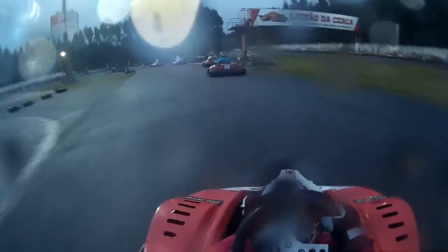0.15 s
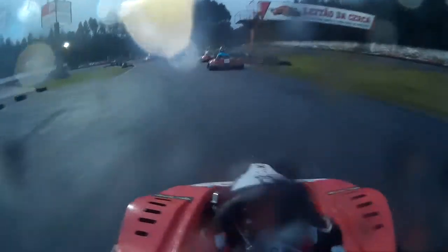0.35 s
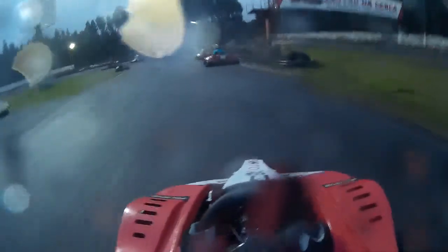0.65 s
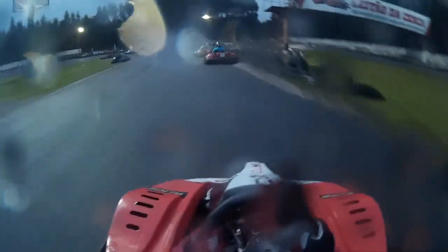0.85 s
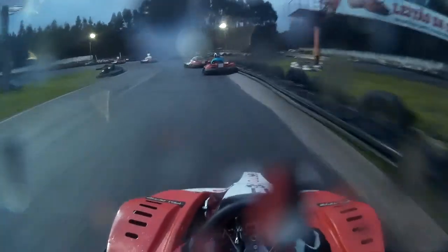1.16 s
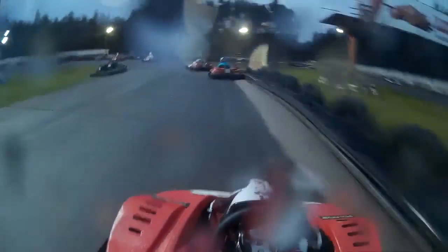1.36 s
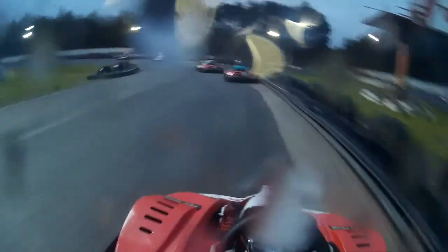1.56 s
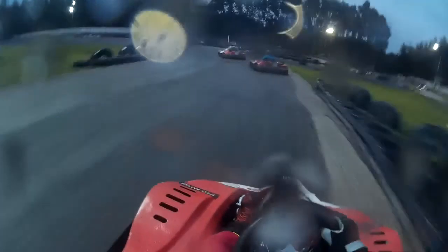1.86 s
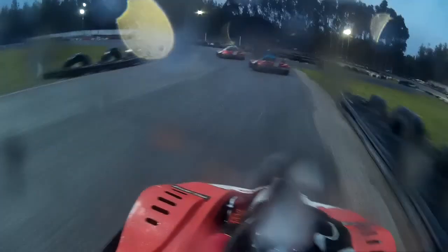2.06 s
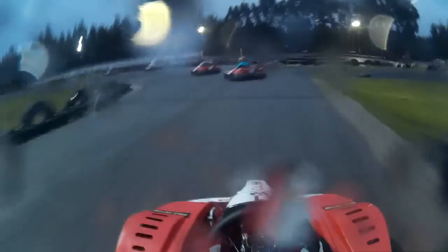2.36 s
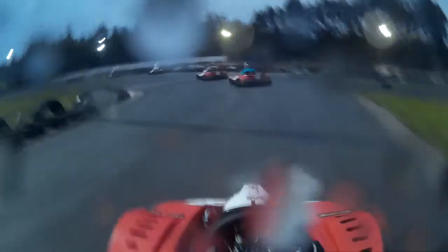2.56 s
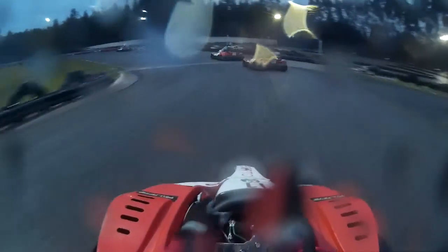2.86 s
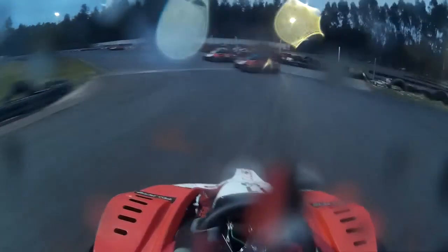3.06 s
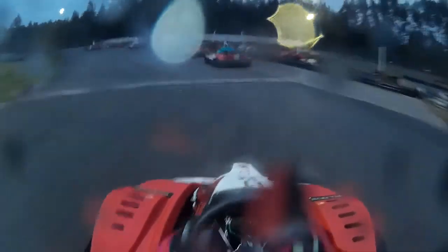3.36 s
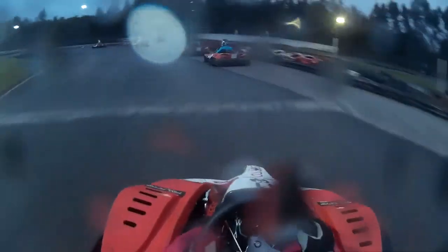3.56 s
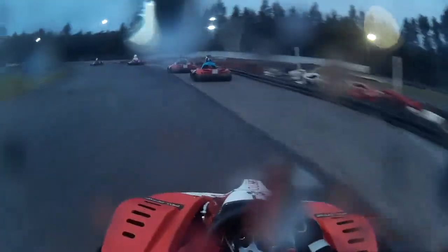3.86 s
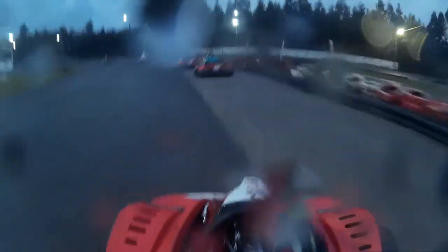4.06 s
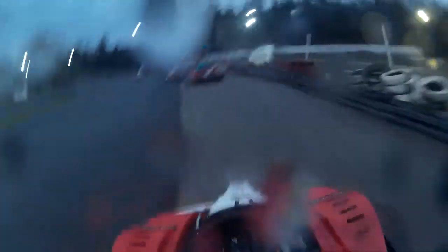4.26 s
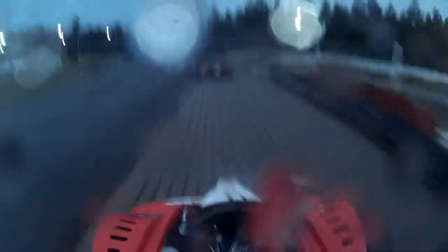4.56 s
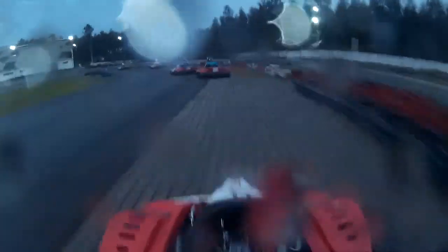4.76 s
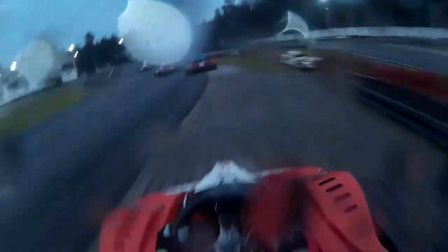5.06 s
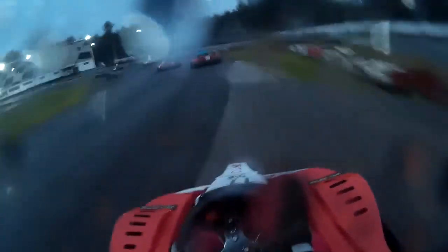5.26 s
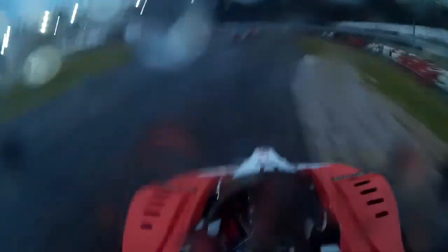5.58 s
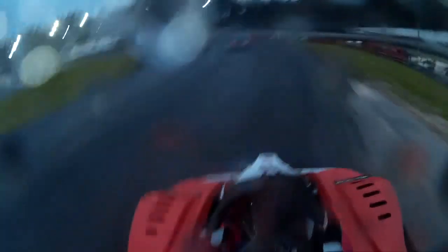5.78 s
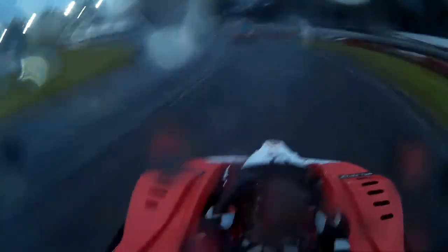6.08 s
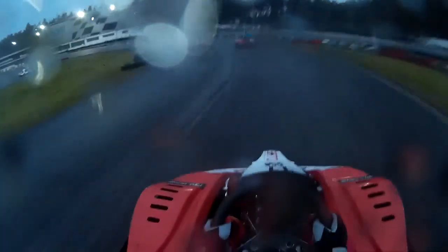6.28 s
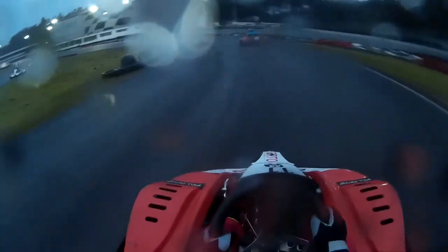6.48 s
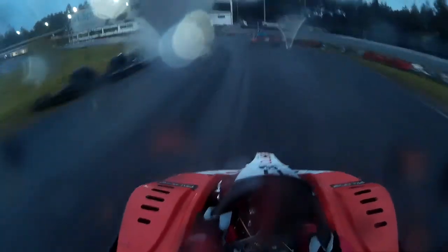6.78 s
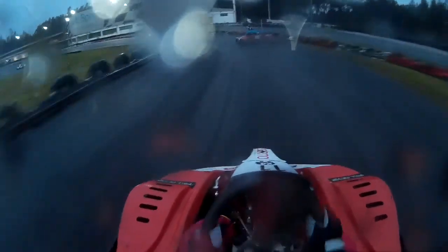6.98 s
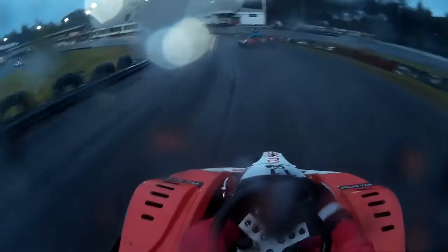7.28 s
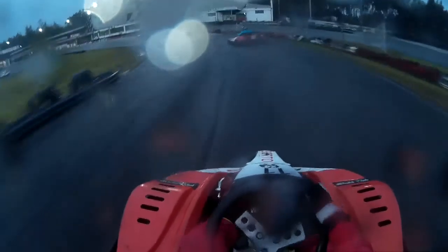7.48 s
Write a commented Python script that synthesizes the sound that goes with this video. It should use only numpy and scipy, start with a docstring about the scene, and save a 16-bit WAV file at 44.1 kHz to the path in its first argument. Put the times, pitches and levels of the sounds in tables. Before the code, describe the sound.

A single-cylinder kart engine is heard close up from on board, with a boxy, enclosed tone. It starts on the throttle with a rapid, rasping putter, lifts at about 0.4 seconds, blips near 0.7, then coasts more softly from 0.9 to 2. It barks again until 2.8 and falls to its lowest pitch around 3.5. After a few quick stabs it pulls steadily from about 3.9 seconds, wavering, then climbing to its highest pitch at 6.7. The throttle shuts, the pitch sags, and the engine picks up again at 7.4. Throughout, the chain rattles, whining thinly under load, over low tyre rumble and swells of frame vibration. Dull bumps come near 1.7, 2.4, 4.4 and between 5.5 and 5.9 seconds. A kart ahead adds fainter runs of sharp exhaust crackle, mostly from 3 to 5.5 seconds and again around 7.

```python
"""The exhaust of a four-stroke, single-cylinder kart, heard on board through a closed camera housing.
On the throttle each firing excites the pipe's modes (a thump) and releases a turbulent jet (a bark).
The piston shakes the frame, the chain whines under tension and bumps thud in the chassis.
Off the throttle, chain and tyres rattle on and the sharper exhaust of a kart ahead is unmasked."""
import sys
import numpy as np
from scipy import signal
from scipy.fft import rfft, irfft
from scipy.io import wavfile

SR = 44100
rng = np.random.default_rng(int(sys.argv[2]) if len(sys.argv) > 2 else 0)


def file_out(sig):
    """Save sig as 16-bit WAV at sys.argv[1]."""
    # one column per channel
    cols = np.atleast_2d(sig).T
    # limit, then scale
    lim = np.clip(cols, -1, 1)
    pcm = np.round(lim * 32767).astype(np.int16)
    wavfile.write(sys.argv[1], SR, pcm)


N = 336483
TIME = np.arange(N) / SR
CRUISE_HZ = 27  # firing rate at cruising speed; excess_hz is the rate above it


def gain_of(db):
    """Amplitude ratio of a level in decibels."""
    return 10 ** (np.asarray(db) / 20)


def unit_rms(x):
    """Normalisation to rms 1."""
    return x / np.sqrt(np.mean(x ** 2) + 1e-20)


def wander(cutoff_hz):
    """Random fluctuation: low-passed noise of rms 1."""
    f = np.fft.rfftfreq(N, 1 / SR)
    return unit_rms(irfft(rfft(rng.standard_normal(N)) / (1 + (f / cutoff_hz) ** 4), N))


def add(mix, start, sound):
    """Superposition of a sound on the mix, in place."""
    part = mix[round(start * SR):][:len(sound)]
    part += sound[:len(part)]


def pulse_train(times, sizes, shape):
    """Convolution with impulses puts a scaled copy of the shape at each time."""
    impulses = np.zeros(N)
    impulses[np.clip(np.round(times * SR).astype(int), 0, N - 1)] = sizes
    return signal.oaconvolve(impulses, shape)[:N]


def puff(rise_s, decay_s, tail, tail_s):
    """Envelope of a gush of gas: a rise, then exponential decay with a weak, slower tail."""
    t = TIME[:SR // 10]
    shape = (1 - np.exp(-(t / rise_s) ** 2)) * (np.exp(-t / decay_s) + tail * np.exp(-t / tail_s))
    return shape / shape.max()


def microphone_hiss(level_db=-72):
    """Self-noise of the microphone: steady and white."""
    return gain_of(level_db) * rng.standard_normal(N)


# Resonances of the housing: f/Hz, bandwidth/Hz, boost/dB
HOUSING_MODES = [(732, 35, 6), (1351.5, 61, 7), (2878, 72, 7), (3103, 174, 6.5), (4029, 290, 12.5),
                 (5560, 250, 5), (7790, 830, 7), (10860, 950, 3.5)]
def through_housing(x, spectrum):
    """A minimum-phase filter of unit power gain imposes a source spectrum and the housing's resonances."""
    f = np.fft.rfftfreq(8192, 1 / SR)
    knots_hz, knots_db = np.transpose(spectrum)
    db = np.interp(np.log(f + 1), np.log(knots_hz), knots_db)
    db += sum(boost / (1 + (2 * (f - hz) / width) ** 2) for hz, width, boost in HOUSING_MODES)
    log_gain = np.log(gain_of(np.r_[db, db[-2:0:-1]]))
    response = np.exp(np.conj(signal.hilbert(log_gain)))
    ring = np.fft.ifft(response).real[:len(f)]
    return signal.oaconvolve(x, ring / np.linalg.norm(ring))[:N]


# Spectrum of the tyres' rumble: f/Hz, relative level/dB
TYRE_SPECTRUM = [(22, -26), (38, -14), (58, 0), (95, -8), (170, -13), (260, -12), (350, -15), (600, -19),
                 (1500, -45), (4000, -80)]
def tyre_roll(level_db=-42, lumpy_db=1):
    """Structure-borne noise: tyres on asphalt rumble through the frame, whatever the throttle does."""
    level = gain_of(level_db + lumpy_db * wander(2.9))
    return through_housing(level * rng.standard_normal(N), TYRE_SPECTRUM)


# Bumps in the track: t/s, level/dB, Gaussian width/s, upper cutoff f/Hz
TRACK_BUMPS = [(1.71, -34, .025, 85), (2.44, -36, .02, 85), (4.3, -36, .03, 600), (4.51, -32, .03, 90),
               (5.5, -33, .018, 260), (5.85, -36, .02, 120), (5.92, -33, .02, 300)]
def chassis_thuds():
    """Impact excitation: each bump draws a burst of low noise from the unsprung chassis."""
    out = np.zeros(N)
    for at, db, width, top_hz in TRACK_BUMPS:
        band = signal.butter(2, [45, top_hz], "band", fs=SR, output="sos")
        rumble = unit_rms(signal.sosfilt(band, rng.standard_normal(N)))
        out += gain_of(db) * rumble * np.exp(-.5 * ((TIME - at) / width) ** 2)
    return out


# Throttle bursts of the kart ahead: start t/s, duration/s, firing rate f/Hz, relative level/dB
AHEAD_BURSTS = [(1.148, 0.22, 24.8, -46), (1.744, 0.11, 24.6, -38), (3.074, .26, 25.2, -41.5),
                (3.351, 0.38, 26.9, -35), (4.053, 1.4, 28.5, -37.5), (7.027, 0.35, 30.3, -38.5)]
# Spectrum of its cracks: f/Hz, relative level/dB
CRACK_SPECTRUM = [(300, -28), (830, -10), (1060, 23.5), (1250, 24), (2000, -16.5), (3000, 1.5), (4000, -10),
                  (5600, -10), (6600, -25), (7800, -16.5), (11000, -29.5), (15000, -42)]
def kart_ahead(boost_db=7.0):
    """Pulsed jet noise: runs of bright cracks from an exhaust that points back at the listener."""
    gush = np.zeros(N)
    crack = puff(rise_s=.00092, decay_s=.013, tail=.08, tail_s=.023)
    for start, length, rate, db in AHEAD_BURSTS:
        firings = start + np.arange(0, length, 1 / rate)
        sizes = gain_of(db + boost_db + rng.standard_normal(len(firings)))
        gush += pulse_train(firings, sizes, crack)
    return through_housing(gush * rng.standard_normal(N), CRACK_SPECTRUM)


def chain_tension(opening, lag_s=.023):
    """First-order lag: the chain takes up the pull a little after the throttle."""
    pole = np.exp(-1 / (lag_s * SR))
    return 1 - signal.lfilter([1 - pole], [1, -pole], 1 - opening)


def chain_whine(cycles, firing_hz, tension, teeth_per_cycle=28, guard_hz=736, guard_width_hz=83):
    """Forced resonance: the sprocket's meshing tone swells and wavers near the chain guard's note."""
    resonance = 1 / (1 + (2 * (teeth_per_cycle * firing_hz - guard_hz) / guard_width_hz) ** 2)
    level = gain_of(-42.5 + 7.6 * resonance) * np.sqrt(np.maximum(tension, 0))
    level *= 1 + .3 * wander(14)
    phase_jitter = (.25 + 1.5 * resonance) * wander(9)
    return level * np.sin(2 * np.pi * teeth_per_cycle * cycles + phase_jitter)


# Spectrum of chain and valve gear: f/Hz, relative level/dB
GEAR_SPECTRUM = [(350, -27), (550, -3), (850, -2.5), (1020, 0.5), (1200, 5.5), (1900, 0), (2600, -15.5),
                 (3500, -28), (5000, -31.5), (8000, -41.5), (12000, -45.5), (15500, -53)]
def gear_rattle(cycles, tension, excess_hz, slack_db=4.5, db_per_hz=.31, flutter_db=1.5):
    """Amplitude-modulated noise: chain and valves grow with load and speed and throb at each crank turn."""
    db = -29 - slack_db * (1 - tension) + db_per_hz * excess_hz + flutter_db * wander(55)
    throb = 1 + .14 * np.cos(4 * np.pi * cycles)
    return through_housing(gain_of(db) * throb * rng.standard_normal(N), GEAR_SPECTRUM)


# Swells of the frame's vibration: t/s, Gaussian width/s, boost/dB
SHAKE_SWELLS = [(.22, 0.12, 14), (.75, 0.23, 7), (3.656, 0.27, 9), (4.47, .04, 10), (6.302, 0.052, 9.5),
                (6.934, .09, 7)]
def piston_shake(cycles, base_db=-43):
    """Forced vibration: the piston shakes the frame twice in each firing cycle."""
    swell_db = sum(boost * np.exp(-.5 * ((TIME - at) / width) ** 2) for at, width, boost in SHAKE_SWELLS)
    level = gain_of(base_db + swell_db) * (1 + .4 * wander(8))
    return level * np.sin(4 * np.pi * cycles + .15 * wander(4.7))


# Presses of the throttle: press t/s, lift t/s, travel time/s, opening (0 to 1)
THROTTLE_PRESSES = [(-.1, .372, .05, .93), (.665, .775, .012, .97), (.78, .93, .03, .62),
                    (2.0, 2.785, .24, .98), (3.56, 3.74, .06, .76), (3.7, 3.96, .05, .6),
                    (3.87, 6.713, .11, 1.0), (7.39, 7.8, .07, .97)]
def throttle(shut_s=.013, overshoot=.038, settle_s=.5):
    """Step response of the slide, 0 to about 1: it opens, overshoots, settles and snaps shut."""
    opening = np.zeros(N)
    for press, lift, travel, depth in THROTTLE_PRESSES:
        held = np.clip(np.minimum((TIME - press) / travel, 1 - (TIME - lift) / shut_s), 0, 1)
        surge = 1 + overshoot * np.exp(-np.maximum(TIME - press - travel, 0) / settle_s)
        opening = np.maximum(opening, depth * held * surge)
    return opening


def starvation_db(opening, loss_db=6.5, recover_s=.14):
    """Exponential recovery: after a lift the engine starves, then picks up its idle."""
    lifts = [lift for _, lift, _, _ in THROTTLE_PRESSES]
    starved = sum((TIME > lift) * np.exp(-abs(TIME - lift) / recover_s) for lift in lifts)
    return loss_db * starved * (opening == 0)


# Single firings that burn harder or softer: t/s, level change/dB
ODD_FIRINGS = [(.34, 0), (.684, 3.5), (2.255, -1.5), (2.766, -1), (4.0, -0.5), (4.745, 2.5), (4.817, 3.5),
               (5.04, 4), (6.564, 1.5)]
def combustion_db(firings, spread_db):
    """Cycle-to-cycle variation: no two firings burn alike, and a few stand apart."""
    accents = sum(db * (abs(firings - at) < 1 / (2 * CRUISE_HZ)) for at, db in ODD_FIRINGS)
    return accents + spread_db * rng.standard_normal(len(firings))


def pipe_ring(modes, rise_s=.0005):
    """Modal superposition at the pipe's mouth: damped cosines, neighbours opposite in sign."""
    t = TIME[:SR // 10]
    ring = -sum((-1) ** k * gain_of(db) * width * np.exp(-np.pi * width * t) * np.cos(2 * np.pi * hz * t)
                for k, (hz, width, db) in enumerate(modes))
    ring *= 1 - np.exp(-(t / rise_s) ** 2)
    return signal.sosfilt(signal.butter(4, 2100, fs=SR, output="sos"), ring)


# Modes of the air in the exhaust pipe: f/Hz, bandwidth/Hz, relative level/dB
PIPE_MODES = [(136, 31.8, 2), (191.9, 28.2, 2), (297, 150, -8), (375.7, 57, -3.5), (459, 31, -1),
              (558, 72, -6.5), (683, 38, 1.5)]
# Modes of the silencer's thin shell: f/Hz, bandwidth/Hz, relative level/dB
SHELL_MODES = [(1020, 410, -16.5), (1247, 123, -2), (1341, 28, 3.5), (1607, 58, -4.5), (1679, 57, 5.5),
               (1798, 68, -1), (2090, 40, -6.5)]
def exhaust_thump(firings, opening, excess_hz, shut_db=4.5, db_per_hz=.46, spread_db=.2):
    """Pressure steps excite the modes of pipe and shell; off the throttle mainly the deep ones sound."""
    deep_modes, bright_modes = PIPE_MODES[:3], PIPE_MODES[3:] + SHELL_MODES
    shut = 1 - np.minimum(opening, 1)
    drive_db = -36.5 - shut_db * shut ** 2 + db_per_hz * excess_hz - starvation_db(opening)
    deep_db = np.interp(firings, TIME, drive_db) + spread_db * rng.standard_normal(len(firings))
    tilt_db = np.interp(firings, TIME, -.07 * excess_hz - 13 * shut)
    bright_db = deep_db + tilt_db + combustion_db(firings, spread_db)
    out = pulse_train(firings, gain_of(bright_db), pipe_ring(bright_modes))
    # Hot gas carries sound faster: the deep modes rise with speed and sag off the throttle.
    tunings = np.interp(firings, TIME, 1 + .015 * excess_hz - .071 * shut)
    for at, size, tuning in zip(firings, gain_of(deep_db), tunings):
        add(out, at, size * pipe_ring([(hz * tuning, width, db) for hz, width, db in deep_modes]))
    ring_rms = np.sqrt(np.mean(pipe_ring(deep_modes)[:SR // 40] ** 2))
    return out / ring_rms


# Spectrum of the exhaust jet: f/Hz, relative level/dB
JET_SPECTRUM = [(600, -17), (950, -16), (1280, 3.5), (1500, -11), (1720, -7), (2050, -10.5), (2650, -22),
                (3400, -32), (4500, -38), (6300, -45), (8500, -50.5), (11000, -54), (15000, -96)]
def exhaust_bark(firings, opening, excess_hz, shut_db=21.5, db_per_hz=.03, lead_s=.00052):
    """Turbulence: gas escapes as the valve lifts, in a burst of jet noise without bass."""
    drive_db = -16.5 - shut_db * (1 - opening) + db_per_hz * excess_hz
    db = np.interp(firings, TIME, drive_db) + combustion_db(firings, spread_db=.77)
    burst = puff(rise_s=.0014, decay_s=.0066, tail=.05, tail_s=.011)
    gush = pulse_train(firings - lead_s, gain_of(db), burst)
    jet = through_housing(gush * rng.standard_normal(N), JET_SPECTRUM)
    return signal.sosfilt(signal.butter(3, 650, "high", fs=SR, output="sos"), jet)


# Engine speed: t/s, firing rate f/Hz
FIRING_RATE = [(0.0, 28.7), (0.15, 28.88), (0.56, 25.16), (0.71, 26.98), (1.17, 25.95), (2.05, 25.83),
               (2.48, 27.05), (2.75, 28.55), (2.89, 24.57), (3.46, 23.28), (4.13, 25.97), (4.27, 27.5),
               (4.67, 26.92), (4.85, 27.32), (5.11, 26.35), (5.33, 27.51), (5.58, 27.82), (6.31, 30.62),
               (6.68, 32.87), (6.82, 30.48), (7.34, 28.96), (7.64, 31.24)]
def scene():
    """Superposition: engine and chain, locked to one firing cycle, over tyres, bumps and the kart ahead."""
    firing_hz = np.interp(TIME, *np.transpose(FIRING_RATE))
    excess_hz = firing_hz - CRUISE_HZ
    cycles = .42 + np.cumsum(firing_hz) / SR  # one cycle is two crank turns
    firings = TIME[1:][np.diff(np.floor(cycles)) > 0]
    opening = throttle()
    tension = chain_tension(opening)
    exhaust = exhaust_thump(firings, opening, excess_hz) + exhaust_bark(firings, opening, excess_hz)
    chassis = piston_shake(cycles) + gear_rattle(cycles, tension, excess_hz) + tyre_roll()
    chassis += chain_whine(cycles, firing_hz, tension) + chassis_thuds()
    return (exhaust + chassis + kart_ahead() + microphone_hiss())[None]


def record(dry, low_hz=35, high_hz=15700):
    """Band limiting: the microphone drops the deepest bass and the highest treble."""
    thinned = signal.sosfilt(signal.butter(2, low_hz, "high", fs=SR, output="sos"), dry)
    low_pass = signal.firwin(511, high_hz, window=("kaiser", 9), fs=SR)
    return signal.oaconvolve(thinned, low_pass[None], "same")


dry = scene()
out = record(dry)
file_out(out)
```